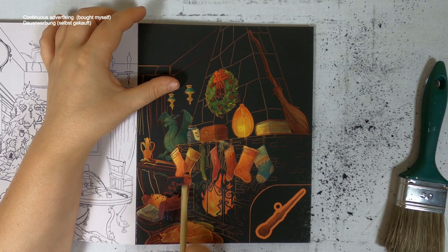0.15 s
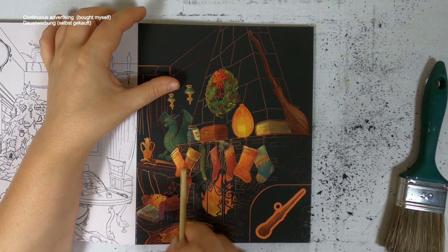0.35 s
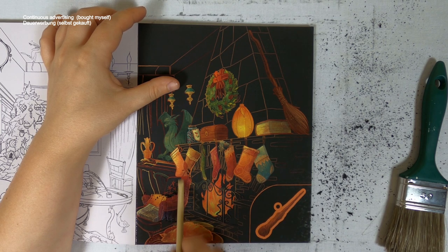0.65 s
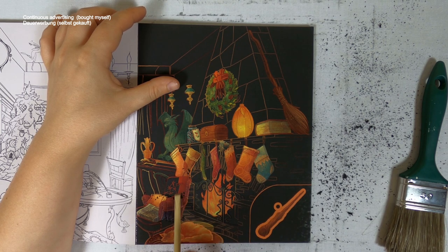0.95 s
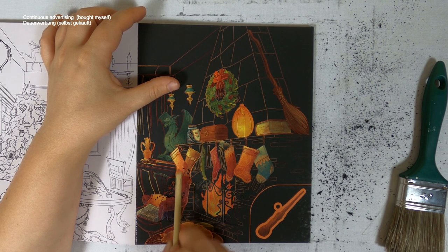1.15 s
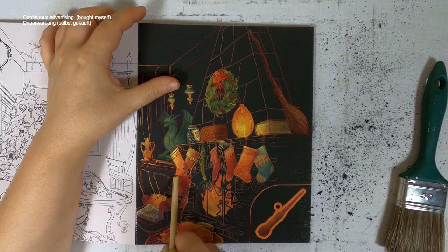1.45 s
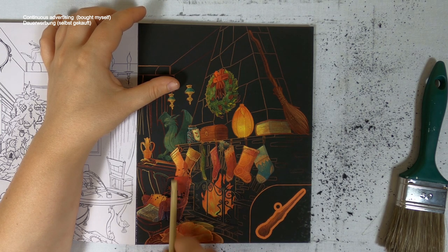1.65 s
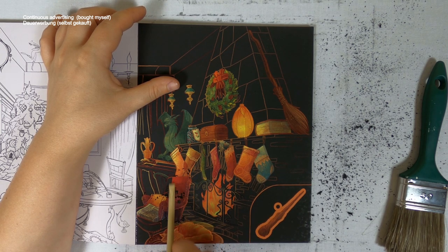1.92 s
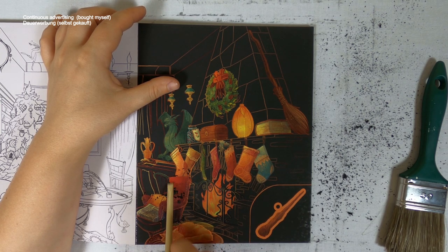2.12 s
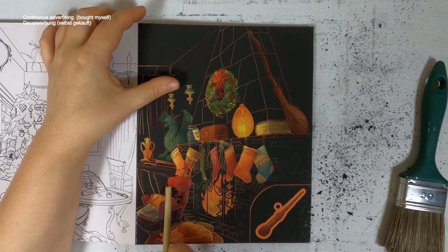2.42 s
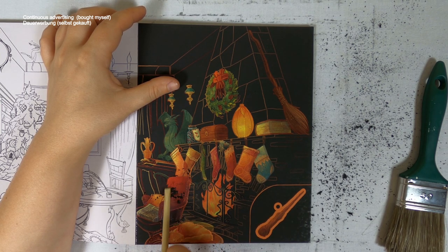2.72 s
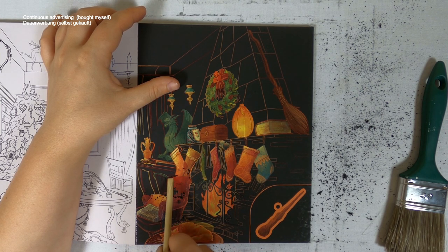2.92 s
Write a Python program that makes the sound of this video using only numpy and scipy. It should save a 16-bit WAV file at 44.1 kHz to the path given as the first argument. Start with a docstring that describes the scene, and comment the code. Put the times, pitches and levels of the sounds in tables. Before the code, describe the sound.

Short hollow rasping scratches of a wooden stick on coated paper, with faint hiss and small ticks.

```python
"""A pointed wooden stylus scrapes to and fro over a coated paper sheet on a table, close by in a quiet room.
Each stroke is band-shaped friction noise, a hollow rasp sinking in pitch, with a hiss of flaking coating.
The tip judders in short falling chirps and snags with a tick; between strokes it skims back lightly.
The table thuds softly as a damped tone. Behind lie a short dull room tail, fading air and a deep rumble."""
import sys
import numpy as np
from scipy import signal
from scipy.fft import rfft, irfft, next_fast_len
from scipy.io import wavfile
from scipy.ndimage import map_coordinates

SR = 44100
rng = np.random.default_rng(int(sys.argv[2]) if len(sys.argv) > 2 else 0)


def int16_out(signal):
    """Quantize to a 16-bit WAV file."""
    q = np.round(np.clip(np.atleast_2d(signal).T, -1, 1) * 32767)
    wavfile.write(sys.argv[1], SR, q.astype(np.int16))


N = 134505

# Quiet air of the place. Each row: frequency in Hz, relative level in dB.
AIR_COLOUR = [(105, -18), (145, 0.5), (330, -5), (2000, -28.5), (11000, -33), (15500, -49)]
AIR_START_DB, AIR_FADE_DB_PER_S = -65, 0.5
# Swells of a deep rumble. Each row: time in seconds, peak in dB added to the steady rumble.
RUMBLE_SWELLS = [(.72, -61), (.86, -59)]
RUMBLE_DB, SWELL_S = -77.5, 0.053
# Likeness of left and right in noise. Each row: frequency in Hz, correlation from -1 to 1.
STEREO_LIKENESS = [(30, 1), (130, 0.37), (400, 1), (1200, 0.96), (4000, 0.19), (13000, -0.16)]
ROOM_T60_S, ROOM_DB, ROOM_DAMPING_HZ = 0.4, -12, 5000

# The hand presses on the table. Each row: time in seconds, level in dB before the soft onset.
TABLE_THUDS = [(0.571, -38), (1.293, -47), (1.784, -46.5)]
TABLE_HZ, TABLE_T60_S, TABLE_ONSET_S = 147.3, 0.13, 0.013

# Colour of the flaking coating. Each row: frequency in Hz, relative level in dB.
HISS_COLOUR = [(900, -6), (1800, 5), (2250, -5), (4800, -5), (5400, -12), (7500, -16), (9000, -10.5),
               (10300, -22), (12000, -18.5), (15500, -35)]
# Narrow resonances of paper and stylus. Each row: frequency in Hz, lift in dB.
HISS_RESONANCES = [(2520, 3), (2960, 6.5), (3620, 4), (4560, 0.5)]
PEAK_WIDTH_OCTAVES = 0.071
# Colour change of the hiss under the lighter grip. Each row: frequency in Hz, gain in dB.
LIGHT_GRIP_COLOUR = [(2000, 2), (3000, -9), (3400, 7), (3800, -5), (5500, -0.5), (8600, 2), (11000, -2.5)]
# Stereo lean of the hiss. Each row: frequency in Hz, left minus right in dB.
HISS_LEAN = [(5000, 1.85), (12000, -1.5)]
GRIP_CHANGE_S = 1.39  # the strokes flake less from here on
FIRM_HISS_DB, LIGHT_HISS_DB = -14.5, -15.5  # over the stroke level, before the effect of speed
SPEED_DB_PER_OCTAVE, HISS_ARCH_DB, HISS_ROUGH_DB = 7, 2, 1.8
CHIPS_PER_S, CHIP_DB = 2000, -4
CRACK_DB, CRACK_T60_S = -22.5, 0.01  # burst of flaking at a snag, level over the snag

# The tip skims back with hardly any pressure. Each row: start in seconds, length in seconds, level in dB.
LIGHT_SKIMS = [(0.33, 0.026, -55), (0.757, 0.073, -56.5), (1.033, 0.045, -62), (1.714, 0.043, -57.5),
               (1.984, 0.1, -58), (2.291, 0.065, -58), (2.568, 0.12, -60), (2.857, .095, -58.5)]
SKIM_HZ, SKIM_HISS_DB, SKIM_RISE_SHARE = 743, -14.5, 0.45

# Response of the sheet on its backing. Each row: frequency in Hz, gain in dB.
SHEET_RESPONSE = [(110, -23), (290, -7.5), (338, 3), (390, -4.5), (555, -8.5), (640, -2), (738, 2),
                  (830, -5), (1020, -5), (1280, 3), (1900, -22), (2250, -22.5), (4000, -42)]
LEFT_LAG_S = 0.00004
# The tip snags. Each row: time in seconds, level in dB before the sheet.
TIP_SNAGS = [(.403, -22.5), (0.766, -15.5), (1.105, -22), (1.146, -27.5), (1.4944, -28.5), (1.593, -35),
             (1.645, -34), (1.777, -36.5), (2.075, -28.5)]
KNOCK_HZ, KNOCK_T60_S = 1110, 0.0053
# Judders of the tip. Each row: start in seconds, length in seconds, peak in dB before the sheet,
# first pitch in Hz before the jitter.
TIP_JUDDERS = [ (.219, 0.0196, -36, 1259), (.368, 0.013, -31, 1417), (.392, 0.014, -30.5, 1417),
               (0.563, 0.0177, -27.5, 758), (0.737, 0.02, -24.5, 1002), (0.9, 0.026, -30.5, 1433),
               (0.945, 0.024, -25.5, 1313), (1.086, 0.017, -25.5, 1123), (1.126, 0.0215, -35.5, 995),
               (1.275, 0.025, -28.5, 1313), (1.459, 0.0087, -28, 790), (1.759, 0.0143, -36.5, 802),
               (2.042, 0.02, -32, 806), (2.468, 0.014, -35, 807)]
JUDDER_END_HZ, JUDDER_JITTER = 686.6, 0.091  # jitter as a share of the pitch
JUDDER_CREST = 0.7  # loudest point as a share of the length

# Scraping strokes. Each row: start in seconds, rise in seconds, hold in seconds, level in dB before the
# sheet, rasp centre in mid-stroke in Hz.
SCRAPE_STROKES = [ (.000, 0.062, 0.039, -52.5, 930), (0.203, 0.025, 0.038, -43.5, 740),
                  (0.361, 0.033, 0.016, -41.5, 1350), (0.545, 0.012, 0.055, -35.5, 874),
                  (0.606, 0.011, 0.019, -38.5, 366), (0.697, 0.042, 0.024, -38.5, 995),
                  (0.891, 0.028, 0.055, -39, 1044), (1.063, 0.026, 0.053, -43, 1060),
                  (1.261, 0.019, 0.05, -39, 880), (1.4, 0.0087, 0.018, -43, 617),
                  (1.452, 0.0095, 0.026, -38.5, 607), (1.546, 0.049, 0.025, -39, 690),
                  (1.753, 0.0053, 0.025, -46.5, 694), (1.84, 0.02, 0.058, -41.5, 650),
                  (2.035, 0.017, 0.012, -41, 673), (2.138, 0.029, 0.042, -40.5, 585),
                  (2.21, 0.0074, 0.015, -47.5, 332), (2.423, 0.057, 0.02, -39.5, 620),
                  (2.723, 0.036, 0.049, -46, 620)]
RELEASE_DB_PER_S, HISS_RELEASE_DB_PER_S = 474, 420
RASP_OCTAVES, RASP_ROUGH_DB, RASP_TRIM_DB = 0.98, 2, 0.5
SAG_OCTAVES_PER_S, LIGHT_SAG_OCTAVES_PER_S = 7.9, 6.5

TOP_HZ = 15700


def amp(db):
    """Decibels to gain."""
    return 10 ** (np.asarray(db) / 20)


def unit(x):
    """Scale to rms 1."""
    return x / np.sqrt(np.mean(x ** 2) + 1e-20)


def along(points, hz):
    """Rows of frequency and value, read on a log frequency axis."""
    f, v = np.transpose(points)
    return np.interp(np.log(hz + 1), np.log(f + 1), v)


def clock():
    """The time of each sample in seconds."""
    return np.arange(N) / SR


def wobble(rate):
    """A smooth random curve, rate knots a second."""
    return map_coordinates(rng.standard_normal(N // 8), [clock() * rate], mode="wrap")


def filtered(x, response):
    """x times a response of frequency."""
    m = next_fast_len(N + SR // 4)
    return irfft(rfft(x, m) * response(np.fft.rfftfreq(m, 1 / SR)), m)[..., :N]


def noise(gain):
    """Stereo noise of rms 1 with a given colour; the treble is the widest."""
    def mid_side(hz):
        turn = np.arccos(np.clip(along(STEREO_LIKENESS, hz), -1, 1)) / 2
        return gain(hz) * np.array([np.cos(turn), np.sin(turn)])
    mid, side = filtered(rng.standard_normal((2, N)), mid_side)
    return unit(np.array([mid + side, mid - side]))


def ringing(colour_db, size=4096):
    """Causal impulse response of a given colour: the cepstrum is folded to minimum phase."""
    cepstrum = irfft(np.log(amp(colour_db(np.fft.rfftfreq(size, 1 / SR)))))
    cepstrum[1:size // 2] *= 2
    cepstrum[size // 2 + 1:] = 0
    return irfft(np.exp(rfft(cepstrum)))[:size // 2]


def add(track, s, sound):
    """Mix a sound in at time s."""
    part = track[max(0, round(s * SR)):][:len(sound)]
    part += sound[:len(part)]


def background():
    """Quiet, slowly fading room air and a deep steady rumble with brief swells."""
    level = amp(RUMBLE_DB)
    for s, db in RUMBLE_SWELLS:
        level = level + amp(db) * np.exp(-((clock() - s) / SWELL_S) ** 2)
    rumble = level * noise(lambda hz: np.exp(-((hz - 32) / 15) ** 2))
    air = noise(lambda hz: amp(along(AIR_COLOUR, hz)))
    return rumble + amp(AIR_START_DB - AIR_FADE_DB_PER_S * clock()) * air


def room(x, shared=0.5):
    """A short, dull tail of decaying noise, partly alike in both channels."""
    t = clock()[:SR // 2]
    tails = rng.standard_normal((3, len(t))) * amp(-60 * t / ROOM_T60_S)
    tail = np.sqrt(shared) * tails[2] + np.sqrt(1 - shared) * tails[:2]
    tail = tail / np.linalg.norm(tails[2])
    wet = signal.fftconvolve(x, tail, axes=1)[:, :N]
    return filtered(wet, lambda hz: 1 / np.hypot(1, hz / ROOM_DAMPING_HZ))


def table():
    """Soft thuds of the table top under the hand: a damped tone with a gentle onset."""
    out, t = np.zeros(N), clock()[:SR // 3]
    ring = amp(-60 * t / TABLE_T60_S) * np.sin(2 * np.pi * TABLE_HZ * t)
    ring *= 1 - np.exp(-t / TABLE_ONSET_S)
    for s, db in TABLE_THUDS:
        add(out, s, amp(db) * ring)
    return out


def movements():
    """Strokes and skims alike as (start, rise, hold, level, rasp centre, hiss level over the stroke)."""
    strokes = [(*row, FIRM_HISS_DB if row[0] < GRIP_CHANGE_S else LIGHT_HISS_DB)
               for row in SCRAPE_STROKES]
    skims = [(s, length * SKIM_RISE_SHARE, length * (1 - SKIM_RISE_SHARE), db, SKIM_HZ, SKIM_HISS_DB)
             for s, length, db in LIGHT_SKIMS]
    return strokes + skims


def stroke_shape(t, start, rise, hold, release_db_per_s):
    """The tip speeds up, slides and comes to rest."""
    onset = np.clip((t - start) / rise, 0, 1) ** 0.89
    return onset * amp(-release_db_per_s * np.maximum(t - start - rise - hold, 0))


def hiss_colour(hz):
    """The broad colour of the flaking with its narrow resonances, in dB."""
    peaks = sum(db * np.exp(-(np.log2((hz + 1) / c) / PEAK_WIDTH_OCTAVES) ** 2)
                for c, db in HISS_RESONANCES)
    return along(HISS_COLOUR, hz) + peaks


def flaking():
    """Fine dust and coarser chips of coating break away, most in mid-stroke and at snags, and ring the paper."""
    t = clock()
    power = np.zeros(N)
    for start, rise, hold, db, hz, hiss_db in movements():
        arch = np.sin(np.pi * np.clip((t - start) / (rise + hold + 0.11), 0, 1)) - 1
        speed_db = SPEED_DB_PER_OCTAVE * np.log2(hz / 800)  # a faster tip flakes more
        level = amp(db + hiss_db + speed_db + HISS_ARCH_DB * arch)
        power += (level * stroke_shape(t, start, rise, hold, HISS_RELEASE_DB_PER_S)) ** 2
    for s, db in TIP_SNAGS:
        power += amp(db + CRACK_DB - 60 * abs(t - s) / CRACK_T60_S) ** 2
    dust = noise(lambda hz: 1)
    chips = unit((rng.random(N) < CHIPS_PER_S / SR) * rng.standard_normal(N))
    clumps = amp(HISS_ROUGH_DB * wobble(rate=140))
    grains = unit((dust + amp(CHIP_DB) * chips) * clumps) * np.sqrt(power)
    ring = ringing(hiss_colour)
    firm = signal.fftconvolve(grains, ring[None] / np.linalg.norm(ring), axes=1)[:, :N]
    light = filtered(firm, lambda hz: amp(along(LIGHT_GRIP_COLOUR, hz)))
    hiss = np.where(t < GRIP_CHANGE_S, firm, light)
    return filtered(hiss, lambda hz: amp(along(HISS_LEAN, hz) * np.array([[.5], [-.5]])))


def snags():
    """The tip catches with a tick: a very short damped knock."""
    out, t = np.zeros(N), clock()[:SR // 50]
    knock = np.sin(2 * np.pi * KNOCK_HZ * t) * amp(-60 * t / KNOCK_T60_S)
    for s, db in TIP_SNAGS:
        add(out, s, amp(db) * knock)
    return out


def judders():
    """The tip sticks and slips ever more slowly: a swelling, falling chirp with a wavering pitch."""
    out = np.zeros(N)
    for s, length, db, first_hz in TIP_JUDDERS:
        u = np.linspace(0, 1, int(length * SR))
        waver = map_coordinates(rng.standard_normal(12), [u * 11])
        pitch = first_hz * (JUDDER_END_HZ / first_hz) ** u * (1 + JUDDER_JITTER * waver)
        phase = 2 * np.pi * np.cumsum(pitch) / SR
        swell = np.sin(np.pi / 2 * np.interp(u, [0, JUDDER_CREST, 1], [0, 1, 0]))
        add(out, s, amp(db) * swell * np.sin(phase))
    return out


def rasp(count=10):
    """Rough friction in a broad band that sinks in pitch during each movement."""
    t = clock()[::32]  # coarse time grid for the band levels
    centres = 150 * 2 ** (np.arange(count) / 2)  # half-octave steps from 150 Hz
    power = np.zeros((count, len(t)))
    for start, rise, hold, db, hz, _ in movements():
        sag = SAG_OCTAVES_PER_S if start < GRIP_CHANGE_S else LIGHT_SAG_OCTAVES_PER_S
        centre = hz * 2 ** (-sag * np.clip(t - start - (rise + hold) / 2, -hold, .08))
        band = 1 / (1 + (np.log2(centres[:, None] / centre) / RASP_OCTAVES) ** 2) ** 3.1
        level = amp(db + RASP_TRIM_DB) * stroke_shape(t, start, rise, hold, RELEASE_DB_PER_S)
        power += band / band.sum(0) * level ** 2
    friction = noise(lambda hz: 1)
    out = 0
    for c, p in zip(centres, power):
        part = filtered(friction, lambda hz: np.maximum(1 - 2 * abs(np.log2((hz + 1) / c)), 0))
        out = out + unit(part) * np.interp(clock(), t, np.sqrt(p))
    return out * unit(amp(RASP_ROUGH_DB * wobble(rate=350)))


def sheet():
    """Rasp, judders and snags all sound through the sheet, a little to the right as the left lags."""
    ring = ringing(lambda hz: along(SHEET_RESPONSE, hz))
    sound = signal.fftconvolve(rasp() + judders() + snags(), ring[None], axes=1)[:, :N]
    return filtered(sound, lambda hz: np.exp(-2j * np.pi * hz * LEFT_LAG_S * np.array([[1], [0]])))


def scene():
    """The close scraping, its room and the background."""
    near = sheet() + flaking() + table()
    return near + amp(ROOM_DB) * room(near) + background()


def record(dry):
    """The microphone channel keeps nothing above the band limit."""
    return filtered(dry, lambda hz: hz < TOP_HZ)


dry = scene()
out = record(dry)
int16_out(out)
```